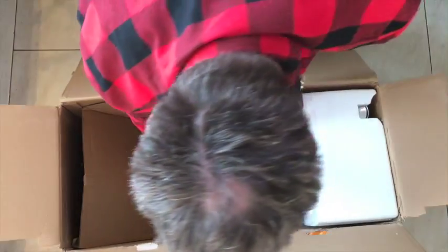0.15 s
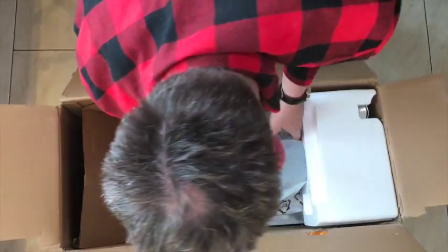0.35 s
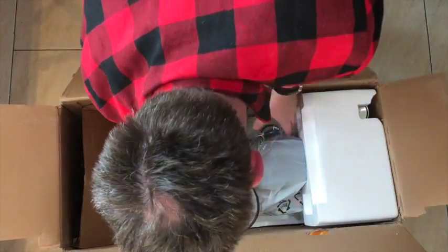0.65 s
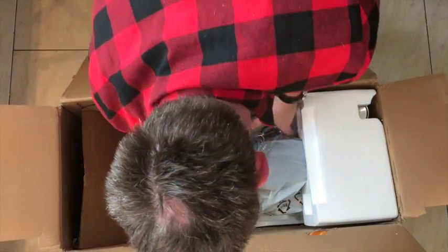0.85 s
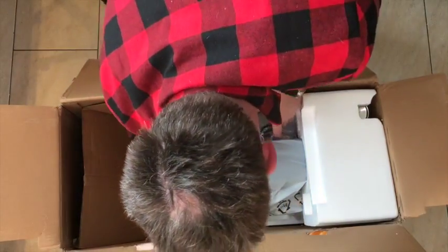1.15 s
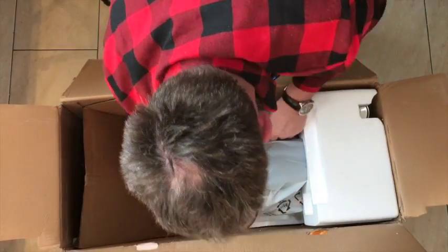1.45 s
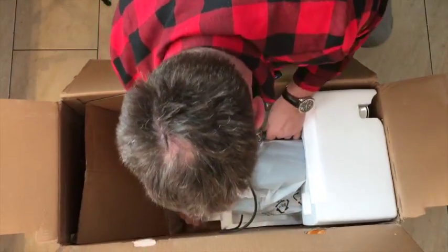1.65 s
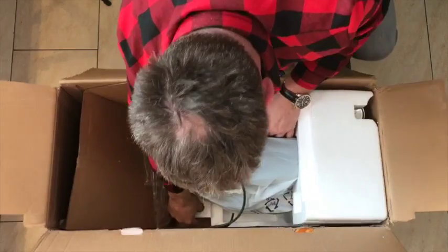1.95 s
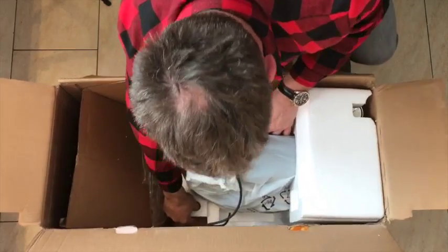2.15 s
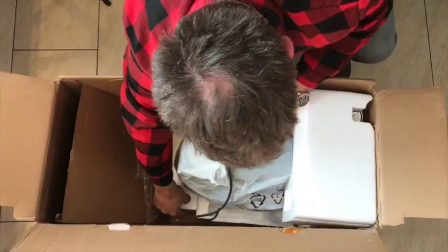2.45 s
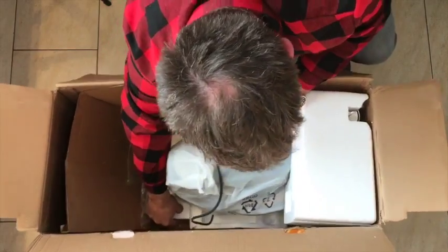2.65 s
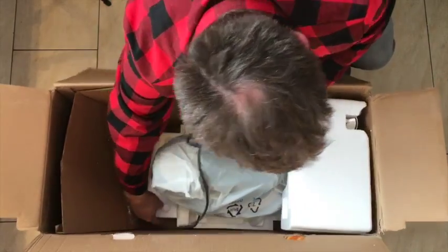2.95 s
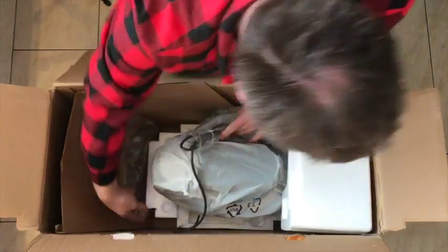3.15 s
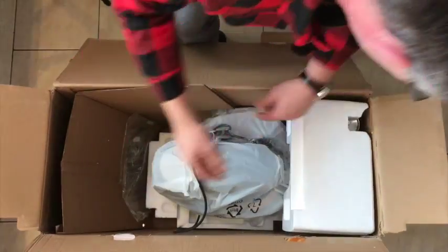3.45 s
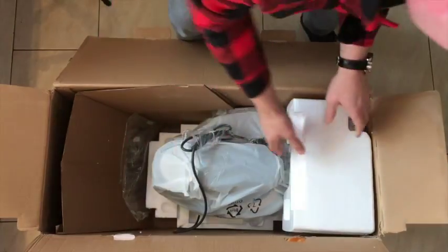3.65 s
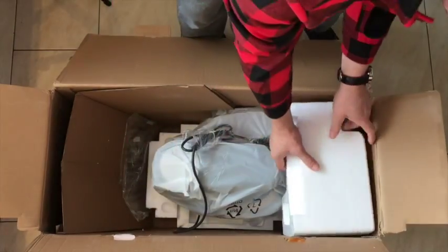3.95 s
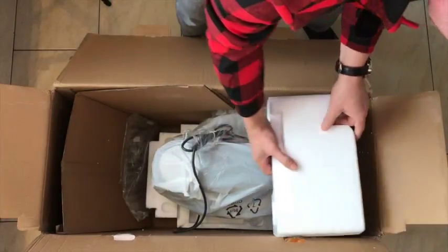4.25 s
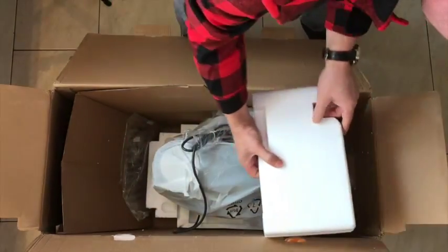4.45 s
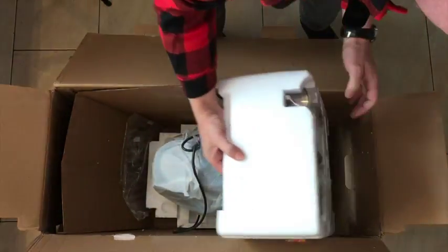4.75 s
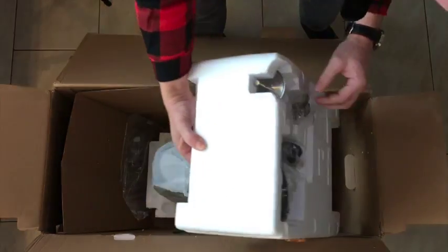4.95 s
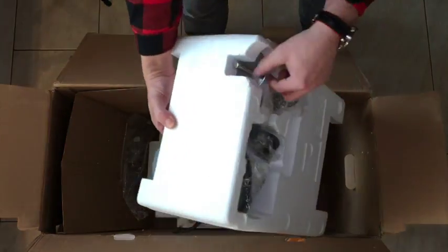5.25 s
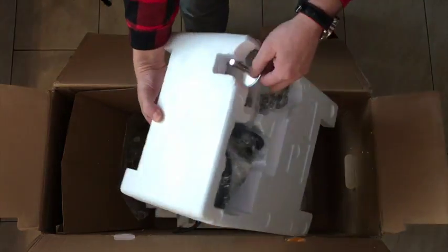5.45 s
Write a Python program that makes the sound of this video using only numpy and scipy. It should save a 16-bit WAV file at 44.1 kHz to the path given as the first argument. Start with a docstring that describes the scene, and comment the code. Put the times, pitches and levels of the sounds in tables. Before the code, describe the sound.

A large carton is being unpacked indoors, close microphone, slight hard-room echo. First soft plastic rustling and hollow cardboard knocks, then a sharp clack and heavier scraping with a tiny squeak. A quiet gap follows. Then a foam block is gripped and dragged in short hissing strokes, bumps the box, comes loose and gets lighter, thinner rubs.

```python
"""Unpacking a cardboard box

Hands and sleeves rub over a plastic bag and scrape cardboard: random slip clicks, coloured by surface.
Parts knock and clack (decaying sines and noise); creases, beads and fingers snap and tap (noise bursts);
short squeaks are wavering tones. Then a polystyrene block is gripped, dragged up the side and lifted
clear: more slips, driving resonances that change as it comes free. All is close, in a little tiled room.
"""
import sys
import numpy as np
from scipy import signal
from scipy.fft import rfft, irfft, next_fast_len
from scipy.io import wavfile
from scipy.ndimage import uniform_filter1d, map_coordinates

SR = 44100
rng = np.random.default_rng(int(sys.argv[2]) if len(sys.argv) > 2 else 0)


def materialize(psi):
    """Save the field psi as 16-bit PCM at rate SR to the path in sys.argv[1].

    A 1-D psi becomes a single channel; in a 2-D psi each row is a channel.
    """
    bounded = np.clip(np.atleast_2d(psi).T, -1, 1)
    quanta = np.round(bounded * 32767).astype(np.int16)
    wavfile.write(sys.argv[1], SR, quanta)


N = 246556
TIME = np.arange(N) / SR  # s, whole scene
SHORT = TIME[:SR // 2]  # s, time axis of one short event
TOP_HZ = 15900  # top of the audible band

# colour of the shaken box walls: f/Hz, relative density/dB per Hz
WALL_COLOUR = [(25, -2.5), (70, -7.5), (120, -5), (185, 0.5), (240, 1), (310, 3), (400, -3), (550, -0.5),
               (750, -16), (1500, -40)]


def undb(db):
    """Decibels to gain."""
    return 10 ** (np.asarray(db) / 20)


def unit(x):
    """Scale to rms 1."""
    return x / np.sqrt(np.mean(x ** 2))


def add(track, s, sound):
    """Mix a sound into a track at time s."""
    i = int(s * SR)
    track[i:i + len(sound)] += sound[:N - i]


def colour(x, points):
    """Shape a sound by a (Hz, dB) spectrum, straight over log frequency; rms 1."""
    hz, db = np.transpose(points)
    bins = np.maximum(np.fft.rfftfreq(N, 1 / SR), 1)
    gain = undb(np.interp(np.log(bins), np.log(hz), db))
    return unit(irfft(rfft(x) * gain, N))


def band(x, hz, width):
    """One resonance, gain 1 at its centre."""
    b, a = signal.iirpeak(hz, hz / width, fs=SR)
    return signal.lfilter(b, a, x)


def soften(x, hz):
    """Two-pole low-pass: a softer, longer contact."""
    return signal.sosfilt(signal.butter(2, hz, fs=SR, output="sos"), x)


def ring(modes):
    """Free decay of (Hz, dB, t60) modes, neighbours swinging opposite ways."""
    out = np.zeros(len(SHORT))
    for k, (hz, db, t60) in enumerate(modes):
        decay = np.exp(-np.log(1000) * SHORT / t60)
        out += (-1) ** k * undb(db) * np.sin(2 * np.pi * hz * SHORT) * decay
    return out


def wander(rate):
    """A smooth random drift, spread near 1, taking a new random value rate times a second."""
    step = int(SR / rate)
    held = np.repeat(rng.standard_normal(256), step)[:N]
    return 1.3 * uniform_filter1d(uniform_filter1d(held, step), step)


def controls(strokes, release_s):
    """Strokes speed up, hold and coast to rest, adding in power: gains of hiss, scrape and rumble."""
    power = np.zeros((3, N))
    for s, rise, hold, *levels_db in strokes:
        since_hold = np.maximum(TIME - s - rise - hold, 0)
        # coasting falls to 1/e of the speed in release_s
        speed = np.clip((TIME - s) / rise, 0, 1) * np.exp(-(since_hold / release_s) ** 2)
        power += np.outer(undb(levels_db), speed) ** 2
    return np.sqrt(power)


def slips(rate, spread_db, catch_db, catch_rate):
    """Friction as a stream of tiny slips of uneven size, swelling as the surface catches and lets go."""
    sizes = undb(spread_db * np.minimum(rng.exponential(size=N), 5))
    happens = rng.random(N) < rate / SR  # rate is slips per second
    clicks = happens * rng.choice([-1, 1], N) * sizes
    grip = np.interp(TIME * catch_rate, np.arange(N), rng.standard_normal(N))
    return clicks * undb(catch_db * grip)


def between_walls(x, share, drift, rate, count=4):
    """Reflections off the near walls; their paths change as the hands move, so the colour keeps shifting."""
    out = x.copy()
    for k in range(count):
        lag = .0011 * (k + 1) * np.exp(drift * wander(rate))  # s
        out += (-1) ** k * share * map_coordinates(x, [(TIME - lag) * SR], order=2)
    return out / np.sqrt(1 + count * share ** 2)


def patchy(x, patchy_db, rate, count=56):
    """Narrow bands of the contact patch swell and fade, each on its own, as the touching spot moves."""
    size = next_fast_len(N, True)
    spectrum, bins = rfft(x, size), np.fft.rfftfreq(size, 1 / SR)
    centres, gap = np.linspace(0, TOP_HZ, count, retstep=True)
    out = np.zeros(N)
    for hz in centres:
        depth_db = patchy_db * min((hz + gap) / 3000, 1)  # shallower in the bass
        triangle = np.maximum(1 - np.abs(bins - hz) / gap, 0)
        out += irfft(spectrum * triangle, size)[:N] * undb(depth_db * wander(rate))
    return unit(out)


def still_room():
    """The quiet of the room: steady noise, strongest in the bass."""
    # room tone: f/Hz, relative density/dB per Hz
    tone = [(18, -26), (30, -2), (320, -13), (355, -2.5), (567, -19), (1060, -19), (1690, -21.5),
            (15000, -30)]
    return undb(-80) * colour(rng.standard_normal(N), tone)


def room(x):
    """Diffuse echo of a tiled room: decaying noise whose treble dies first."""
    t60_s, treble_t60_s = 0.5, 0.3
    noise = rng.standard_normal(len(SHORT))
    low = soften(noise, 2000)
    tail = low * undb(-60 * SHORT / t60_s) + (noise - low) * undb(-60 * SHORT / treble_t60_s)
    tail = tail * (SHORT > .008)  # the echo starts after 8 ms
    return signal.fftconvolve(x, tail / np.sqrt(np.sum(tail ** 2)))[:N]


def taps():
    """A light touch on a stiff surface rings briefly in one band, over a duller bump."""
    # taps of fingers and watch strap: t/s, peak level/dB, decay of the touch to 1/e/s
    touches = [(.0415, -41, 0.0035), (3.271, -55.5, 0.004), (3.539, -58.5, 0.012), (3.562, -58, 0.0062),
               (3.576, -44.5, 0.0033), (3.663, -38.5, 0.0044), (4.203, -36.5, 0.0046), (4.949, -38, 0.0025)]
    out = np.zeros(N)
    body = signal.butter(3, [2200, 4000], "bandpass", fs=SR, output="sos")
    for s, db, decay in touches:
        touch = rng.standard_normal(len(SHORT)) * np.exp(-SHORT / decay)
        tap = signal.sosfilt(body, touch) + undb(-10) * soften(touch, 2100)
        add(out, s, undb(db) * tap / np.abs(tap).max())
    return out


def snaps():
    """A crease or bead gives way in a noise burst a few milliseconds long."""
    # creases snapping in the plastic and beads cracking: t/s, peak level/dB, centre f/Hz
    cracks = [(.118, -36, 6000), (.757, -42, 4900), (.768, -41, 6000), (.822, -35.5, 6000),
              (0.868, -34, 4900), (1.051, -37, 5400), (1.319, -36, 5800), (1.456, -37, 3950),
              (1.469, -39, 4000), (1.599, -34, 11000), (1.892, -39, 8000), (2.215, -25, 3480),
              (2.243, -26, 8600), (2.275, -32, 9000), (2.385, -29.5, 8000), (2.963, -39.5, 8000),
              (3.055, -48.5, 10000), (3.085, -49.5, 10000), (3.094, -50, 10000), (3.234, -53, 7780),
              (5.279, -30.5, 7900), (5.368, -40, 13000)]
    decay_s = 0.0015
    out = np.zeros(N)
    for s, db, hz in cracks:
        burst = rng.standard_normal(len(SHORT)) * np.exp(-SHORT / decay_s)
        burst = band(burst, hz, 0.74 * hz)
        burst = band(burst, hz, 1.9 * min(hz, SR / 4))  # width stays below half the sample rate
        add(out, s, undb(db) * burst / np.abs(burst).max())
    return out


def squeaks():
    """A surface briefly sticks and slips at an unsteady rate, with a weak third harmonic."""
    # stick-slip squeaks: t/s, level before softening/dB, pitch f/Hz, length (twice the time to peak)/s
    cries = [(2.626, -24, 795, 0.008), (2.635, -29, 785, 0.012),  (2.932, -44, 2500, 0.0098),
             (3.032, -37.5, 2450, 0.0042)]
    out = np.zeros(N)
    for s, db, hz, length in cries:
        waver = 0.084 * unit(soften(rng.standard_normal(len(SHORT)), 321.7))
        phase = 2 * np.pi * np.cumsum(hz * (1 + waver)) / SR
        rise = 2 * SHORT / length
        envelope = rise ** 2 * np.exp(2 - 2 * rise)
        add(out, s, undb(db) * envelope * (np.sin(phase) + undb(-11.5) * np.sin(3 * phase)))
    return soften(out, 5300)


def clacks():
    """Hard parts meet with a crunch and a short ring, duller when padding lies between."""
    # meetings of hard parts: t/s, level before softening/dB, contact cut-off f/Hz
    hits = [(1.9555, -20.5, 1490), (1.9577, -9.5, 7900), (2.2155, -32, 7000), (2.2432, -26.5, 8920),
            (2.9393, -22, 1310), (3.905, -39, 1520), (4.249, -48, 1100), (4.6762, -42, 1200)]
    # modes of the parts: f/Hz, relative level/dB, t60/s
    part_modes = [(724, -9.5, 0.024), (968, -5.5, 0.021), (1180, -3.5, 0.022), (1392, -2.5, 0.013),
                  (1900, -15.5, 0.022), (2310, -17, 0.034), (2850, -11, 0.023), (3475, -14, 0.024),
                  (4100, -10, 0.0091), (7170, -11.5, 0.0058)]
    out, part = np.zeros(N), ring(part_modes)
    part = part / np.abs(part).max()
    rise = SHORT / 0.0021
    for s, db, contact_hz in hits:
        grit = soften(rng.standard_normal(len(SHORT)), 8300)
        crunch = undb(-16.5) * grit * rise * np.exp(1 - rise)
        add(out, s, undb(db) * soften(part + crunch, contact_hz))
    return out


def knocks():
    """A struck panel swings for a few cycles, sets the box ringing and shakes the loose packing."""
    # blows on the cardboard: t/s, level/dB, struck panel f/Hz, box ring relative to the blow/dB
    blows = [(0.065, -50, 288, 10), (.118, -42.5, 190, -4), (.535, -39, 536, -1.5), (.646, -42, 600, -9),
             (0.692, -41.5, 242, -24), (.822, -42, 397, -5), (.957, -49, 74.4, -1), (1.201, -41, 270, -4),
             (1.252, -42, 152, -19), (1.3959, -25.5, 282, 0.5), (1.451, -39, 320, -3),
             (1.791, -42, 211, 6.5), (1.953, -16.5, 321, 0), (1.969, -25, 302, -18), (2.245, -36, 189, 6.5),
             (2.713, -18.5, 177, -3.5), (2.731, -25, 294, -5), (2.9389, -25, 530, -8),
             (2.939, -32.5, 171, -5), (3.267, -49.5, 193, -0.5), (3.663, -44.5, 168, 9),
             (3.848, -46.5, 310, 14.5), (3.894, -35.5, 272, 6), (3.906, -27, 238, 3),
             (4.249, -34, 450, -2.5), (4.6757, -30, 374, 3), (4.74, -41.5, 183, -5), (4.891, -48, 147, -7),
             (5.061, -42, 256, -12)]
    # modes of the whole box: f/Hz, relative level/dB, t60/s
    box_modes = [(87.5, -29.5, 0.092), (140.7, -28, 0.088), (181, -17, 0.21), (255.9, -15, 0.27),
                 (302.3, -11, 0.1), (394, -10, 0.12), (434, -13, 0.13), (512, -10, 0.05), (580, -24, 0.14),
                 (745, -36, 0.062)]
    swell_cycles = 1.13  # the panel reaches its widest swing after this many cycles
    thump_hz, thump_db, thump_s = 105, -15.5, 0.0058  # each blow also rocks the box on the floor
    out, box = np.zeros(N), ring(box_modes)
    thump = np.sin(2 * np.pi * thump_hz * SHORT) * SHORT / thump_s * np.exp(1 - SHORT / thump_s)
    for s, db, hz, box_db in blows:
        swell = swell_cycles / hz
        panel = SHORT / swell * np.exp(1 - SHORT / swell) * np.sin(2 * np.pi * hz * SHORT)
        rattle = unit(band(rng.standard_normal(len(SHORT)), 600, 800)) * np.exp(-SHORT / 0.02)
        rattle = soften(rattle, 2400) * (1 - np.exp(-SHORT / 0.0024))
        shaken = undb(box_db) * (box + undb(-14.5) * rattle)
        add(out, s, undb(db) * (panel + undb(thump_db) * thump + shaken))
    return out


def rasps(rubbing):
    """The rubbing drives one resonance harder while the surface catches and rings for a moment."""
    # rasps: middle t/s, half length to 1/e/s, f/Hz, width/Hz, peak gain on the rubbing/dB
    catches = [(0.88, .05, 3830, 1100, 5.5), (1.48, 0.058, 3700, 1400, 6), (2.802, 0.035, 587, 300, 11.5),
               (3.028, 0.014, 3270, 1430, 11), (4.337, 0.1, 2120, 202.5, 1.5), (4.42, 0.13, 9500, 1200, -2),
               (5.003, 0.037, 13200, 1200, 7), (5.1, 0.028, 5000, 240, 8), (5.236, 0.018, 2420, 350, 1)]
    out = np.zeros(N)
    for s, length, hz, width, db in catches:
        out += undb(db) * np.exp(-((TIME - s) / length) ** 2) * band(rubbing, hz, width)
    return out


def rummaging():
    """The bag crinkles under the hands while its contents scrape along the cardboard and shake the walls."""
    # hand strokes: t/s, rise/s, hold/s, then plastic hiss, cardboard scrape, wall rumble before trim/dB
    strokes = [(0, 0.0017, .03, -64, -66.5, -61), (.03, .025, 0.022, -56, -59.5, -52.5),
               (.1, 0.013, .002, -52.5, -59.5, -54), (.175, 0.014, 0.098, -52.5, -59.5, -52.5),
               (.34, 0.017, 0.14, -58.5, -64.5, -55.5), (.455, 0.03, 0.065, -57.5, -63.5, -56),
               (.603, 0.0078, 0.062, -56.5, -60, -53), (.735, 0.011, 0.028, -62, -60.5, -58),
               (.815, 0.0076, 0.057, -51.5, -54.5, -48.5), (.92, 0.024, 0.04, -53.5, -57.5, -52),
               (1.02, 0.04, 0.055, -55.5, -58, -55), (1.085, 0.083, .015, -45.5, -53.5, -56),
               (1.22, 0.024, 0.026, -51, -53.5, -56), (1.28, 0.065, .04, -46.5, -54, -51),
               (1.41, 0.047, 0.17, -53, -53, -48), (1.61, 0.053, 0.091, -54.5, -49.5, -46),
               (1.79, 0.065, 0.24, -60, -50.5, -46), (2.09, 0.086, 0.031, -47, -42.5, -47),
               (2.26, 0.013, 0.11, -55, -47.5, -50.5), (2.385, 0.054, 0.018, -42.5, -42.5, -42),
               (2.45, 0.058, 0.048, -40, -42, -40), (2.58, 0.043, 0.11, -44, -41, -40),
               (2.805, 0.037, 0.042, -50.5, -50.5, -48.5), (2.93, 0.017, 0.045, -56.5, -52.5, -42),
               (3.04, .03, .17, -78, -78, -80), (3.13, 0.012, .002, -71, -66, -70),
               (3.245, 0.016, 0.0018, -73.5, -74.5, -57.5)]
    # colour of the plastic: f/Hz, relative density/dB per Hz
    bag_colour = [(1200, -14.5), (2600, -1), (4000, -0.5), (7300, 1.5), (10000, 1), (13500, -0.5),
                  (16000, -9)]
    # colour of the scraped cardboard: f/Hz, relative density/dB per Hz
    card_colour = [(350, -3), (600, -0.5), (1100, 2), (1450, -1), (1850, -5), (2450, -1), (3200, -9.5),
                   (5000, -13), (10000, -22)]
    hiss, scrape, rumble = controls(strokes, release_s=0.063)
    bag = colour(slips(rate=7000, spread_db=2.0, catch_db=2.1, catch_rate=100), bag_colour)
    creases = colour(slips(rate=140, spread_db=6.0, catch_db=-4.0, catch_rate=7.8), bag_colour)
    bag = between_walls(bag + undb(-8.5) * creases, share=0.27, drift=0.23, rate=7)
    card = colour(slips(rate=2600, spread_db=2.5, catch_db=0.5, catch_rate=90), card_colour)
    card = between_walls(card, share=0.34, drift=.35, rate=7)
    walls = colour(slips(rate=900, spread_db=0.5, catch_db=2.0, catch_rate=40), WALL_COLOUR)
    return undb(-0.4) * hiss * bag + undb(1.44) * scrape * card + undb(-2.0) * rumble * walls


def resonate(rub, modes):
    """The rubbing drives a set of (Hz, width Hz, dB) resonances."""
    return sum(undb(db) * band(rub, hz, width) for hz, width, db in modes)


def polystyrene():
    """Foam beads skid over cardboard; the block's resonances change as it comes free."""
    # pulls on the block: t/s, rise/s, hold/s, then bead hiss, block scrape, wall rumble before trim/dB
    pulls = [(3.652, 0.013, 0.043, -53.5, -51, -52), (3.802, 0.026, 0.0036, -50.5, -48, -49),
             (3.9, .006, 0.038, -50, -49.5, -42.5), (3.97, 0.0097, 0.075, -53.5, -51.5, -56.5),
             (4.12, 0.015, 0.093, -50.5, -56, -62.5), (4.2, 0.054, 0.1, -47, -50.5, -49),
             (4.37, 0.035, 0.083, -50, -51.5, -55.5), (4.582, 0.004, 0.016, -50.5, -55, -55.5),
             (4.62, 0.021, 0.0018, -47, -53.5, -66), (4.712, 0.006, 0.021, -48.5, -48, -47.5),
             (4.78, 0.019, 0.16, -55.5, -63.5, -55), (4.9, 0.18, 0.022, -49, -55, -72),
             (5.135, 0.015, 0.016, -53.5, -54, -50), (5.22, 0.0055, 0.038, -49, -49.5, -58),
             (5.366, 0.024, .2, -50.5, -51, -58)]
    # colour of the skidding beads: f/Hz, relative density/dB per Hz
    bead_colour = [(1500, -7), (2800, -6.5), (4000, -2.5), (5200, 0), (7300, 0), (9500, -3.5), (11500, -2),
                   (13600, -4), (16000, -8.5)]
    # colour of the scraping block: f/Hz, relative density/dB per Hz
    block_colour = [(350, -4.5), (550, 0), (750, -6), (1000, -2), (1350, -6.5), (1650, -8.5), (2200, -4.5),
                    (2800, -5), (4000, -12.5), (9000, -30)]
    # slow flexing of the big flaps as the block drags on them: f/Hz, relative density/dB per Hz
    flap_colour = [(20, -2), (45, 7.5), (70, -3), (110, -1.5), (180, -10), (400, -52)]
    # resonances of the block while wedged in the box: f/Hz, width/Hz, level/dB
    wedged_modes = [(462, 42, 7.5), (1360, 180, 1), (2170, 440, -9), (9400, 2300, -4), (13300, 650, 0)]
    # resonances of the block once free: f/Hz, width/Hz, level/dB
    free_modes = [(1340, 400, -4.5), (1930, 110, -10), (2620, 250, -10), (7300, 1700, -17)]
    free_s, freeing_s = 4.68, 0.033  # moment the block starts to come free, and how long it takes
    hiss, scrape, rumble = controls(pulls, release_s=0.068)
    beads = colour(slips(rate=18000, spread_db=2.0, catch_db=1.6, catch_rate=130), bead_colour)
    beads = patchy(beads, patchy_db=2.4, rate=32)
    block = colour(slips(rate=7000, spread_db=2.5, catch_db=0.5, catch_rate=170), block_colour)
    block = between_walls(block, share=0.63, drift=0.192, rate=6)
    walls = colour(slips(rate=1300, spread_db=4.5, catch_db=2.5, catch_rate=23), WALL_COLOUR)
    flaps = colour(rng.standard_normal(N), flap_colour)
    rub = undb(-0.35) * hiss * beads + undb(-1.0) * scrape * block
    freed = np.clip((TIME - free_s) / freeing_s, 0, 1)
    body = (1 - freed) * resonate(rub, wedged_modes) + freed * resonate(rub, free_modes)
    return rub + body + undb(-1.5) * rumble * walls + undb(-9.0) * scrape * flaps


def scene():
    """All the handling, heard close up with a little of the room."""
    rubbing = rummaging() + polystyrene()
    rubbing = rubbing + rasps(rubbing)
    thuds, hard = knocks(), clacks()
    small = snaps() + taps() + squeaks()
    sends = undb(-13) * rubbing + undb(-12.5) * thuds + undb(-11.5) * hard + undb(-24) * small
    mix = rubbing + thuds + hard + small + room(sends) + still_room()
    return mix[None]


def record(dry):
    """A steep low-pass cuts the extreme top."""
    return signal.sosfilt(signal.ellip(10, .2, 70, TOP_HZ, fs=SR, output="sos"), dry)


dry = scene()
out = record(dry)
materialize(out)
```